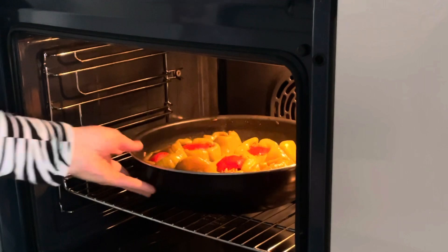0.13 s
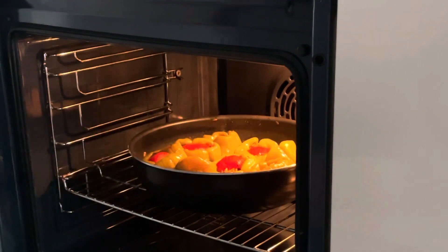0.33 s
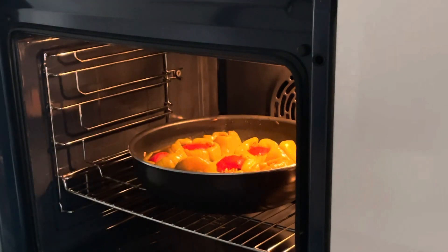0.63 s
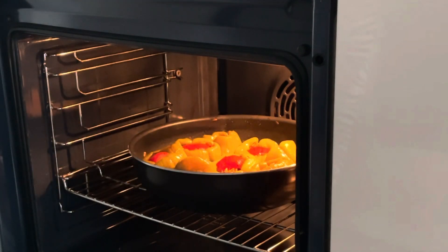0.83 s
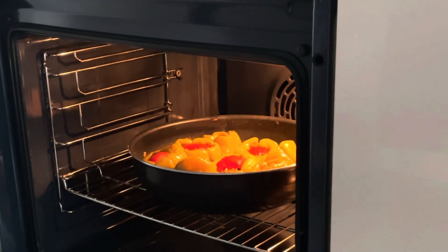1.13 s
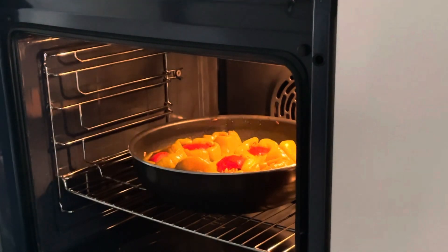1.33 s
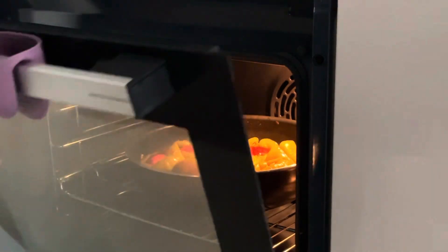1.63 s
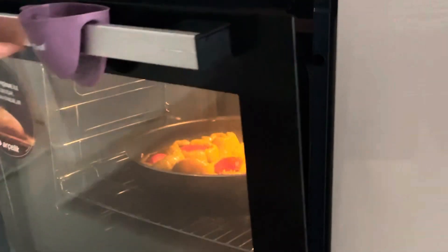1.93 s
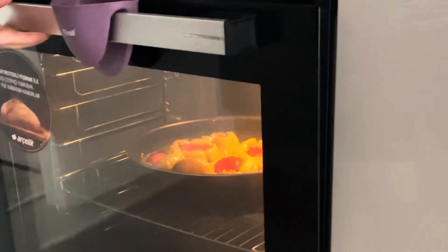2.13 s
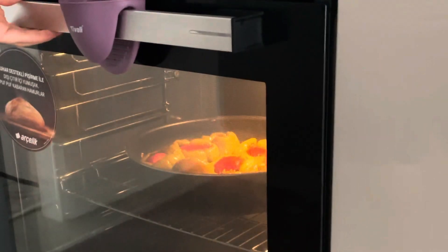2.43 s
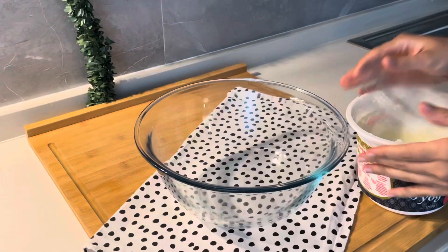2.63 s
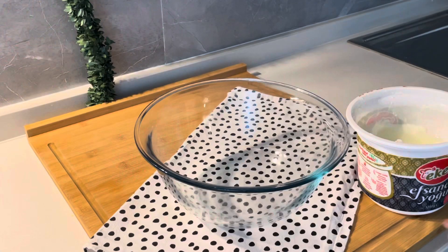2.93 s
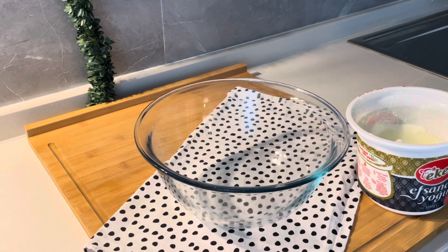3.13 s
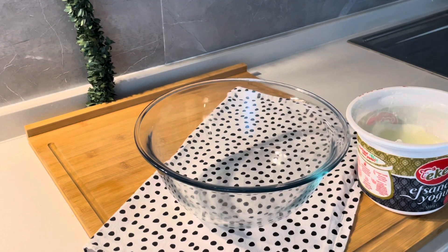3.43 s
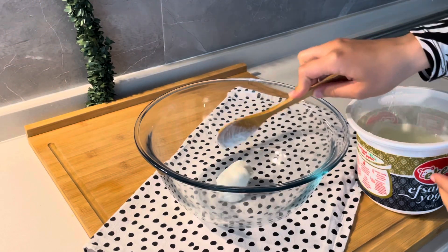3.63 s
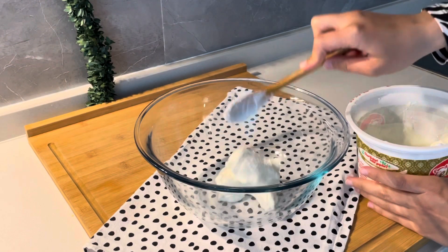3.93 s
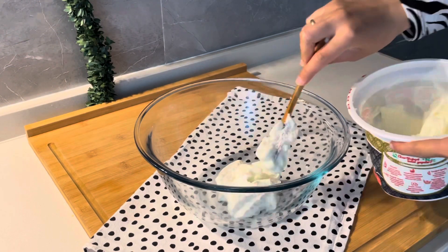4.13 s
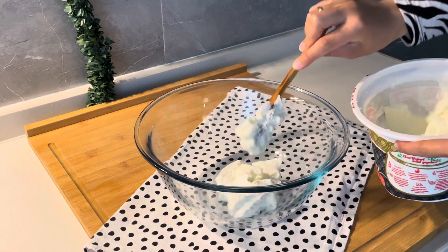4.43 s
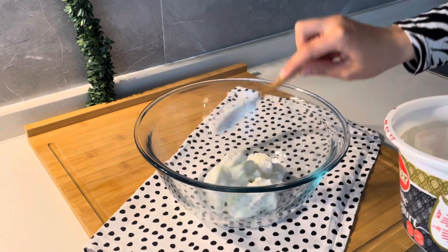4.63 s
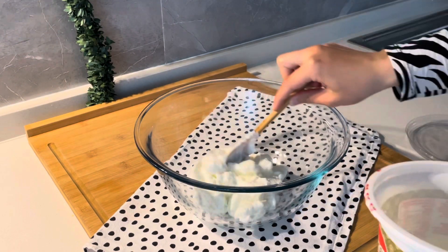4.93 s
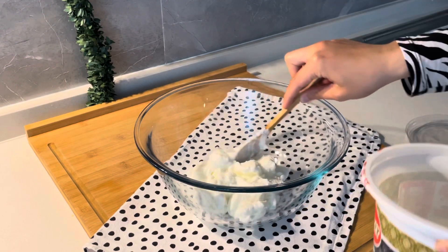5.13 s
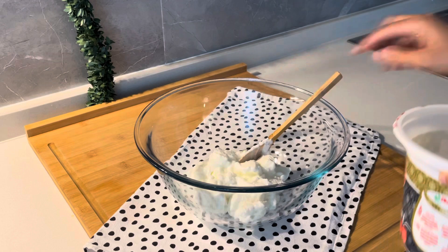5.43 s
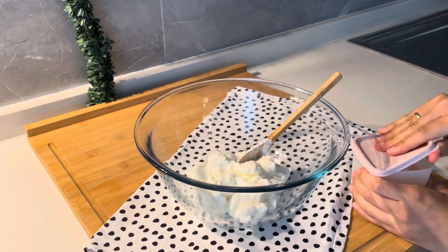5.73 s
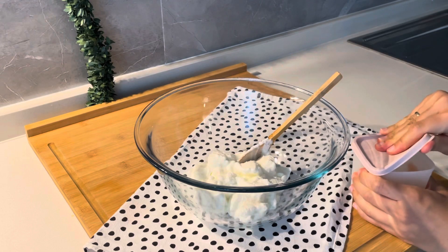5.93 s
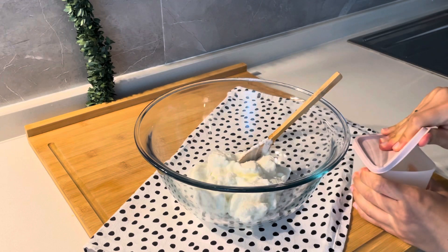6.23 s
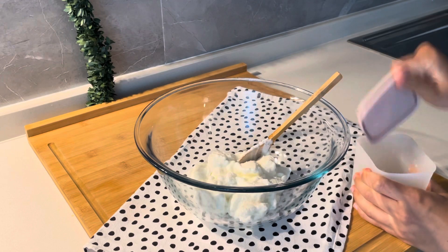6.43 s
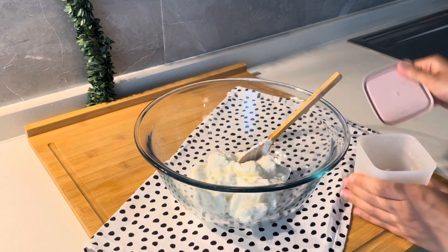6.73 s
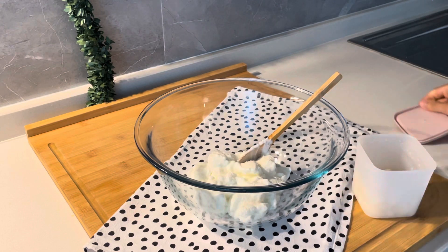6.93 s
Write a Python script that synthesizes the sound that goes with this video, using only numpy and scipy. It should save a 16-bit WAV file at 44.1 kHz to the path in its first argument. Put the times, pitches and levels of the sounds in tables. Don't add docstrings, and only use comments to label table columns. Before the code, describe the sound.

A roaring oven fan is shut behind a knocking metal door, then plastic tubs snap, a spoon taps glass, and a tight lid pops off and clatters.

```python
import sys
import numpy as np
from scipy import signal
from scipy.fft import rfft, irfft, next_fast_len
from scipy.io import wavfile
from scipy.ndimage import uniform_filter1d

SR = 44100
rng = np.random.default_rng(int(sys.argv[2]) if len(sys.argv) > 2 else 0)


def materialize(psi):
    bounded = np.clip(np.atleast_2d(psi).T, -1, 1)
    quanta = np.round(bounded * 32767).astype(np.int16)
    wavfile.write(sys.argv[1], SR, quanta)


def gain_from_db(level_db):
    decades = np.asarray(level_db, float) / 20
    return 10 ** decades


N = 312228

CUTS = [0, 2.482, 3.477, 5.503, 7.1]
# pitch_hz, level_db, t60_s
OVEN_BODY = [(135.5, -3.5, 0.043), (276, -3.5, 0.052), (361, -1.5, 0.072), (534.3, -10, 0.22),
             (790, -11, 0.092), (1003, -8, 0.052)]
# pitch_hz, level_db, t60_s
TUB_BODY = [(790, -9.5, 0.019), (1400, -6.5, 0.097), (1780, -5.5, 0.031), (2000, -4, 0.032),
            (2355, -2, 0.07), (2870, -4.5, 0.059), (3200, -4, 0.036)]
# pitch_hz, level_db, t60_s
BOX_BODY = [(584, 0, 0.021), (847, 4, 0.055), (1096, 3, 0.043), (1540, -11, 0.043), (2070, -22, 0.027),
            (2466, 0, 0.034), (2620, -13, .03), (3430, 0, 0.017), (3870, -4.5, 0.038), (4980, -9, 0.024)]
# frequency_hz, likeness (0 to 1)
ROOM_LIKENESS = [(60, .97), (160, .86), (300, .55), (800, .25), (1500, .2), (3300, .6), (6000, .85),
                 (7600, 1), (8900, 1), (9700, .7), (10500, 1), (12600, 1), (13000, .7), (13600, .99)]
# pitch_hz, level_db, waver_hz
HUM = [(102, -54, 16), (187.7, -65.5, 1.5), (300.9, -59.5, 0.63)]


def evened(x):
    return x / np.sqrt(np.mean(x ** 2) + 1e-20)


def read(points, hz):
    f, value = np.transpose(points)
    return np.interp(np.log(hz + 1), np.log(f + 1), value)


def add(mix, s, sound):
    part = mix[..., round(s * SR):][..., :sound.shape[-1]]
    part += sound[..., :part.shape[-1]]


def level(rows):
    s, db = np.transpose(rows)[:2]
    return gain_from_db(np.interp(np.arange(N) / SR, s, db, left=-140, right=-140))


def noise(colour_db, same, tilt, patchy_db, size):
    hop = size // 4
    hz = np.fft.rfftfreq(size, 1 / SR)
    t = np.arange(N // hop + 5) * hop / SR
    a, b, c, d, patches = rng.standard_normal((len(t), len(hz), 5)).T
    patches = uniform_filter1d(patches, size=9, axis=0)
    patches = evened(uniform_filter1d(patches, size=11, axis=1))
    like = np.clip(read(same, hz), 0, 1)[:, None]
    left = a + 1j * b
    right = like * left + np.sqrt(1 - like ** 2) * (c + 1j * d)
    slope_db = np.log2(hz / 2500 + .05)[:, None] * np.clip(np.interp(t, *tilt), -6, 4)
    shape = gain_from_db(colour_db(hz)[:, None] + slope_db)
    shape = shape / np.linalg.norm(shape, axis=0)
    z = np.array([left, right]) * shape * gain_from_db(patchy_db * patches)
    return evened(signal.istft(z, nperseg=size, noverlap=size - hop)[1][:, :N])


def blows(rows, body, tilt, contact, hollow_db, scatter, small_hz=250):
    out, t = np.zeros(N), np.arange(SR // 2) / SR
    hz = np.fft.rfftfreq(len(t), 1 / SR)
    f, db, t60 = np.transpose(body)[:, :, None]
    for s, peak_db, hollow_hz, ring_db in rows:
        colour_db = tilt * np.log2(hz / 2000 + 0.56)
        colour_db += hollow_db / (1 + ((hz - hollow_hz) / (0.16 * hollow_hz)) ** 2)
        colour_db -= 20 * np.log10(1 + (small_hz / (hz + 1)) ** 2)
        burst = evened(irfft(rfft(rng.standard_normal(len(t))) * gain_from_db(colour_db)))
        burst *= (1 - np.exp(-t / 0.00017)) * np.exp(-t / max(contact, 5e-4)) / 2
        spot, grip = rng.standard_normal((2,) + db.shape)
        modes = gain_from_db(db + 1.5 * spot - 60 * t / t60) * np.sin(2 * np.pi * f * (1 + scatter * grip) * t)
        ring = gain_from_db(ring_db) * modes.sum(0) * (1 - np.exp(-t / 0.00012))
        add(out, s, gain_from_db(peak_db) * (burst + ring))
    return out


def thuds(rows):
    out, t = np.zeros(N), np.arange(SR // 2) / SR
    for s, peak_db, hz, t60 in rows:
        heard = s + t < min(cut for cut in CUTS if cut > s)
        mode = gain_from_db(peak_db - 60 * t / t60) * np.sin(2 * np.pi * hz * t)
        add(out, s, heard * mode * (1 - np.exp(-t / 0.0027)))
    return out


def kitchen(x, wet_db):
    # frequency_hz, t60_s
    decay = [(100, 0.61), (800, 0.71), (3000, 0.42), (10000, 0.16)]
    taps = np.zeros((2, SR))
    at = np.arange(100, SR - 20, 20) + rng.integers(0, 20, (2, (SR - 101) // 20))
    np.put_along_axis(taps, at, rng.choice([-1., 1.], at.shape), 1)
    hz, t, (left, other) = signal.stft(taps, SR, nperseg=256)
    like = .75 * np.clip(read(ROOM_LIKENESS, hz), 0, 1)[:, None]
    z = np.array([left, like * left + np.sqrt(1 - like ** 2) * other])
    tail = signal.istft(z * gain_from_db(-60 * t / read(decay, hz)[:, None]), SR, nperseg=256)[1]
    tail *= gain_from_db(wet_db) / np.linalg.norm(tail[0])
    tail[:, 0] += 1
    tail[[0, 1], [9, 17]] += .4
    edges = [round(s * SR) for s in CUTS]
    shots = [x[a:b] for a, b in zip(edges, edges[1:])]
    return np.hstack([signal.fftconvolve(shot[None], tail, axes=1)[:, :len(shot)] for shot in shots])


def nearby(x):
    # delay_s, gain
    left_echoes = [(.0011, .3), (.0043, -.3), (.0071, .2)]
    right_echoes = [(.0019, -.35), (.0031, .35), (.0088, -.25)]
    ports = []
    for echoes in (left_echoes, right_echoes):
        ports.append(x + sum(gain * np.roll(x, round(s * SR)) for s, gain in echoes))
    return np.array(ports)


def room_tone():
    # frequency_hz, level_db per Hz
    tone_colour = [(25, 4.5), (60, 0.5), (130, -8), (300, -12), (700, -18.5), (1500, -28.5), (2500, -38.5),
                   (4000, -46), (7000, -47.5), (11000, -44.5), (13000, -43), (15500, -62), (16500, -83)]
    # pitch_hz, width_hz, level_db
    hump_rows = [(150, 5.8, 1.1), (960, 11, 11.2), (1238, 17, 9.8), (1880, 97, 9.9), (4550, 320, 12),
                 (7320, 550, 18), (11100, 67, 1.7), (13000, 130, 1.7)]
    # time_s, level_db
    tone_level = [(0, -50), (2.4, -47), (2.6, -48.5), (5.4, -47.5), (5.6, -48), (6.3, -46), (7.08, -46)]

    def colour_db(hz):
        humps = sum(db / (1 + ((hz - f) / width) ** 2) for f, width, db in hump_rows)
        return read(tone_colour, hz) + humps

    out = noise(colour_db, ROOM_LIKENESS, ([0], [0]), patchy_db=-1.07, size=2048) * level(tone_level)
    for hz, db, waver_hz in HUM:
        pole = np.exp(-np.pi * waver_hz / SR)
        drift = evened(signal.lfilter([1], [1, -pole], rng.standard_normal((N, 2)).T))
        waver = 1.3 + .35 * (drift[0] + 1j * drift[1])
        out += gain_from_db(db) * np.real(waver * np.exp(2j * np.pi * hz * np.arange(N) / SR))
    return out


def fan():
    # time_s, level_db, tilt_db per octave
    gap = [
        (0.0, -46, 0.5),
        (1.53, -46.5, 0.5),
        (2.18, -53.5, 0.5),
        (2.48, -62.5, 2),
    ]
    # frequency_hz, level_db
    air_colour = [(30, -49), (65, -28.5), (100, 15.5), (140, -8), (190, 2), (240, -14.5), (400, -6),
                  (900, -9.5), (1800, -19.5), (3500, -30), (6000, -40), (8300, -38.5), (11000, -48),
                  (15500, -64)]
    # frequency_hz, likeness (0 to 1)
    air_likeness = [(60, .85), (200, .95), (500, .5), (1200, .25), (9000, .2), (11000, .97), (15000, .97)]
    hum_db, lag = -9, 4
    s, db, tilt = np.transpose(gap)
    air = noise(lambda hz: read(air_colour, hz), air_likeness, (s, tilt), patchy_db=.6, size=2048) * gain_from_db(4)
    air += gain_from_db(hum_db) * np.cos(2 * np.pi * HUM[2][0] * np.arange(N) / SR)
    return np.array([air[0], np.roll(air[1], lag)]) * level(gap)


def ticks():
    # start_s, peak_db, hollow_pitch_hz
    tick_rows = [(2.9537, -39.5, 7400), (3.3937, -29.5, 6200), (3.987, -44, 5700), (4.6718, -41, 11100),
                 (4.8074, -56, 4530), (4.904, -43, 11900), (5.0294, -60, 4600), (5.503, -47, 3880),
                 (5.609, -51, 3200), (5.755, -39.5, 7650), (5.859, -53, 3780), (6.0544, -54, 12300),
                 (6.11, -46.5, 1490), (6.782, -44, 3200)]
    rows = [(s, db, hz, -42) for s, db, hz in tick_rows]
    return blows(rows, BOX_BODY, tilt=0.41, contact=0.003, hollow_db=11.5, scatter=.04)


def single_modes():
    # start_s, peak_db, pitch_hz, t60_s
    thud_rows = [(.683, -46, 2680, .03), (0.687, -33, 112.8, 0.37), (.69, -40, 195, .2),
                 (0.699, -41, 523, 0.18), (.70, -44, 327, 0.29), (.72, -39, 130, .15),
                 (.728, -38, 340, .12), (1.497, -33, 420, .12), (1.505, -24, 65, 0.34),
                 (1.506, -32, 192, 0.26), (1.52, -37, 112.6, 0.36), (2.572, -39, 784, 0.06),
                 (2.6, -39, 853, 0.09), (2.601, -43, 2850, .03), (2.61, -41, 2250, .03),
                 (2.795, -41, 797, 0.067), (3.226, -28.5, 199.5, 0.22), (3.228, -29.5, 432, 0.07),
                 (3.229, -33, 285, .08), (3.309, -43, 2310, 0.3), (3.31, -40, 1367, 0.16),
                 (3.34, -44, 2340, .3), (3.438, -19, 1770, .04), (3.466, -33, 4800, .04),
                 (3.567, -40, 2810, 0.041), (5.511, -38, 67.5, 0.23), (6.291, -20, 401, 0.056),
                 (6.2915, -31, 147.4, 0.14), (6.292, -19, 1150, .04), (6.293, -19, 490, .07),
                 (6.295, -27, 300, .08), (6.834, -22, 2830, 0.04), (6.8345, -23, 1550, .04),
                 (6.838, -33, 1421, .15), (6.945, -30, 1800, 0.17), (6.953, -31, 1658, .2),
                 (6.997, -32, 1850, .1), (7.014, -28, 1790, .12)]
    return thuds(thud_rows)


def rubbing():
    # start_s, length_s, first_db, last_db, tilt_db per octave
    strokes = [(0.036, 0.45, -67, -58, -1.5), (.5, 1, -73, -63, -4), (1.5, .12, -50, -66, -4.5),
               (2.481, 0.15, -48.5, -44.5, -1.5), (2.643, 0.17, -57, -72, -2.5),
               (2.785, 0.049, -58, -55, -4), (2.845, 0.078, -55, -64, -3), (2.939, 0.17, -57, -58, -2),
               (3.114, 0.1, -61, -47.5, 0.5), (3.229, .13, -38, -48, 0), (3.355, 0.097, -52, -50, -2),
               (3.563, 0.1, -54, -82, 7), (4.007, 0.12, -70, -67, -4), (4.307, 0.54, -80, -63.5, -4),
               (4.899, .022, -53, -73, 3.5), (5.125, 0.16, -69, -65, -0.5), (5.31, 0.2, -51.5, -47.5, -10),
               (5.506, 0.36, -45, -76.5, -9.5), (5.755, .015, -56, -71, 5), (6.11, .014, -60, -70, 0),
               (6.315, 0.125, -35, -41.5, -3), (6.445, 0.4, -41.5, -69, -4), (6.88, 0.16, -57, -43, -1.5),
               (7.004, 0.082, -32, -57, 1.8)]
    # frequency_hz, level_db
    rub_colour = [(300, -6.5), (800, -3.5), (1300, -6.5), (2400, -1), (3200, 3.5), (4200, -2), (6000, -2.5),
                  (8000, 5), (12000, -7.5), (15500, -8)]
    edge_s, grip_shift, ring_db = 0.021, 0.068, -14
    start, length, first_db, last_db, tilt = np.transpose(strokes)
    ends = np.maximum.accumulate(np.ravel([start, start + length], order="F"))
    tilts = (ends, np.repeat(tilt, 2))
    hiss = noise(lambda hz: read(rub_colour, hz), ROOM_LIKENESS, tilts, patchy_db=-0.5, size=256)
    slips = gain_from_db(3.0 * np.minimum(rng.exponential(1, N), 3)) * (rng.random(N) < 250 / SR)
    hiss = hiss * evened(1 + 0.58 * signal.lfilter([1], [1, -np.exp(-1 / (0.0019 * SR))], slips))
    t = np.arange(SR // 8) / SR
    f, db, t60 = np.transpose(TUB_BODY)[:, :, None]
    out, edge = np.zeros((2, N)), np.ones(round(edge_s * SR))
    for s, held, a_db, b_db in zip(start, length, first_db, last_db):
        pressure = np.convolve(gain_from_db(np.linspace(a_db, b_db, round(held * SR))), edge / len(edge))
        at = max(s - edge_s / 2, 0)
        rub = hiss[:, round(at * SR):][:, :len(pressure)]
        rub = rub * pressure[:rub.shape[1]]
        bent = f * (1 + grip_shift * rng.standard_normal(f.shape))
        walls = (gain_from_db(db - 100 * t / t60) * np.sin(2 * np.pi * bent * t)).sum(0)
        walls = walls[None] / np.linalg.norm(walls)
        add(out, at, rub)
        add(out, at, gain_from_db(ring_db) * signal.oaconvolve(rub, walls, axes=1))
    return out * (1 - (np.abs(np.arange(N) / SR - CUTS[2] - .04) < .04))


def oven_door():
    # start_s, peak_db, hollow_pitch_hz, ring_db
    door_rows = [(0.6828, -40.5, 1890, -1), (0.7894, -53.5, 2040, 10.5), (1.494, -24, 2150, -6),
                 (1.5005, -31, 2480, 4), (2.4464, -49, 1880, 8.5)]
    latch_rows = [(1.4825, -24, 2710, -23), (1.4845, -29.5, 3370, -27), (1.489, -29.5, 1400, -25)]
    door = blows(door_rows, OVEN_BODY, tilt=-11, contact=0.0087, hollow_db=8, scatter=.03, small_hz=60)
    door *= np.arange(N) / SR < CUTS[1]
    return door + blows(latch_rows, OVEN_BODY, tilt=-11, contact=0.0094, hollow_db=7, scatter=.03)


def tub():
    # start_s, peak_db, hollow_pitch_hz, ring_db
    tub_rows = [(2.573, -31.5, 790, -26), (2.595, -36.5, 870, -18), (2.611, -34, 1640, -22),
                (2.793, -49, 786, -8), (3.222, -17.5, 4900, -16), (3.226, -18.5, 1980, -35),
                (3.307, -22.5, 5100, -10.5), (3.323, -25.5, 2830, -17), (3.41, -28, 2350, -12),
                (3.418, -25.5, 4850, -12), (3.437, -23, 1690, -5.5), (3.444, -27.5, 1390, -9),
                (3.469, -22.5, 5200, -6), (3.567, -39.5, 4200, -21)]
    touch = dict(tilt=-3.5, contact=0.0045)
    opened = blows(tub_rows[:-1], TUB_BODY, **touch, hollow_db=10, scatter=0.015)
    opened *= np.arange(N) / SR < CUTS[2]
    return opened + blows(tub_rows[-1:], TUB_BODY, **touch, hollow_db=6, scatter=0.013)


def spoon_on_bowl():
    # start_s, peak_db, hollow_pitch_hz, ring_db
    spoon_rows = [(5.3207, -25.5, 1760, -9.5), (5.3215, -34, 3350, -40), (5.3639, -31, 1750, -6),
                  (5.3645, -34, 3380, -40), (5.388, -46, 3300, -32)]
    # pitch_hz, level_db, t60_s
    bowl_body = [(1318, -9, .6), (1322.4, -9, .6), (2438, -15.5, 2.5), (3815, -11, 0.7), (3797, -5, 0.25),
                 (5313, -6, 0.36), (6145, -20, 0.16), (6360, -20, .15), (6620, -19, 0.13), (6993, -14, .06),
                 (7106, -14, 0.12)]
    # start_s, peak_db, pitch_hz, t60_s
    rim_rows = [(5.322, -37.5, 506.4, 0.94), (5.3227, -43.5, 482, 0.88)]
    taps = blows(spoon_rows, bowl_body, tilt=-10, contact=0.0038, hollow_db=10, scatter=0, small_hz=1000)
    return (taps + thuds(rim_rows)) * (np.arange(N) / SR < CUTS[3])


def lid_snaps():
    # start_s, peak_db
    snap_rows = [(6.2766, -20.5), (6.2912, -6.5), (6.3185, -16), (6.3455, -18.5), (6.3714, -17.5),
                 (6.4043, -24), (6.4316, -28), (6.4926, -25.5), (6.5231, -28), (6.536, -28.5),
                 (6.5424, -38)]
    rows = [(s, db, 2450, -8.5) for s, db in snap_rows]
    return blows(rows, BOX_BODY, tilt=-9, contact=0.0046, hollow_db=6.5, scatter=0.035, small_hz=1000)


def trapped_air():
    # start_s, peak_db, pitch_hz
    boom_rows = [(6.2775, -17, 620), (6.2825, -15, 600), (6.291, -4.5, 812), (6.303, -18, 760),
                 (6.319, -15, 790), (6.347, -27, 890), (6.424, -30, 890), (6.499, -33, 880),
                 (6.525, -30, 945), (6.539, -32, 947)]
    length_s, fade_db = 0.0094, -4
    out, t = np.zeros(N), np.arange(0, length_s, 1 / SR)
    sag = 1 - 4.8 * t
    for s, peak_db, hz in boom_rows:
        boom = gain_from_db(peak_db + fade_db * t / length_s) * np.sin(2 * np.pi * hz * t * sag)
        add(out, s, boom * signal.windows.tukey(len(t), .3))
    return out


def pop_tail():
    span_s, first_db, fade_db = (6.3, 6.78), -23, -31
    middle_hz, spread_octaves, knock_s = 860, .42, .007
    out, t = np.zeros((2, N)), np.arange(0, knock_s, 1 / SR)
    along, size, side = rng.random((400, 3)).T
    pitch = middle_hz * 2 ** (spread_octaves * rng.standard_normal(len(along)))
    start = np.interp(along, [0, 1], span_s)
    peak_db = first_db + fade_db * along - 10 * size
    for at, db, hz, lean in zip(start, peak_db, pitch, side):
        knock = gain_from_db(db) * np.sin(2 * np.pi * hz * t) * np.hanning(len(t))
        angle = np.pi * (lean - .25)
        add(out, at, knock * np.array([[np.cos(angle)], [np.sin(angle)]]))
    return out


def lid_on_counter():
    # start_s, peak_db, hollow_pitch_hz, ring_db
    lid_rows = [(6.8323, -12.5, 1400, -10), (6.8366, -24.5, 2830, -23.5), (6.9401, -7.5, 1300, -17),
                (6.9436, -12, 3300, -15), (6.9521, -18.5, 5100, -11), (6.9999, -28, 1830, -18),
                (7.0119, -13, 4330, -19), (7.0161, -24, 2380, -12), (7.0206, -32, 1790, -8),
                (7.0246, -15, 3130, -16.5), (7.0281, -22, 5900, -14), (7.0311, -30, 1790, -8)]
    # pitch_hz, level_db, t60_s
    lid_body = [(484, -16, 0.08), (1250, -6, 0.04), (1421, -8, 0.04), (1658, -4, 0.06), (1850, -4, 0.07),
                (2400, -10, .03), (2821, -6, 0.03), (3144, -12, .04), (3305, -13, .03), (4200, -14, .03),
                (5100, -14, .04)]
    return blows(lid_rows, lid_body, tilt=-2, contact=0.0031, hollow_db=6, scatter=0.02, small_hz=700)


def scene():
    near = ticks() + oven_door() + tub() + lid_on_counter()
    close = single_modes() + spoon_on_bowl() + lid_snaps() + trapped_air()
    share = 0.3
    struck = kitchen(near + share * close, wet_db=-3.5) + (1 - share) * nearby(close)
    return room_tone() + fan() + rubbing() + pop_tail() + struck


def top_cut(x):
    return signal.sosfilt(signal.butter(12, 16820, fs=SR, output="sos"), x)


def record(dry):
    # frequency_hz, half_turns
    port_turn = [(100, 0), (1700, .2), (3500, -.2), (5200, -.15), (5900, .1), (7300, .65), (7750, 1),
                 (8800, 1), (10600, 1.7), (12300, 2), (13200, 2.3), (13900, 3)]
    # frequency_hz, level_db
    port_lean = [(100, .7), (500, -.5), (1600, -.5), (2200, 4.5), (3200, 4.5), (5200, 3), (7600, 0),
                 (16000, 0)]
    # frequency_hz, level_db
    microphone = [(20, -32), (40, -12), (65, 0), (12000, 0), (14500, -5), (16500, -9), (17000, -40)]
    ceiling = .88
    size = next_fast_len(N)
    hz = np.fft.rfftfreq(size, 1 / SR)
    lean = gain_from_db(read(port_lean, hz) / 2)
    turn = np.exp(1j * np.pi * read(port_turn, hz))
    ports = np.array([lean, turn / lean]) * gain_from_db(read(microphone, hz))
    heard = irfft(rfft(dry, size) * ports, size)[:, :N]
    heard = heard / (1 + (heard / ceiling) ** 6) ** (1 / 6)
    return top_cut(heard)


dry = scene()
out = record(dry)
materialize(out)
```